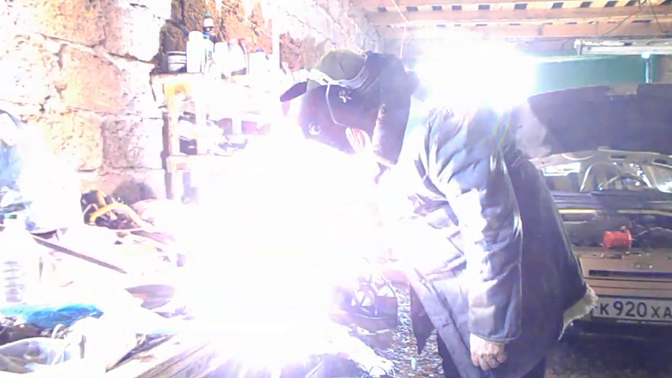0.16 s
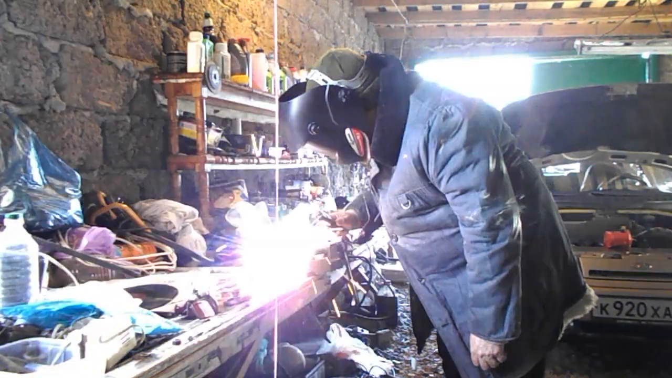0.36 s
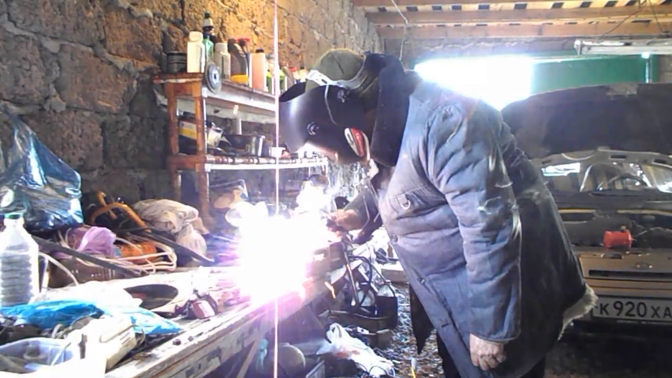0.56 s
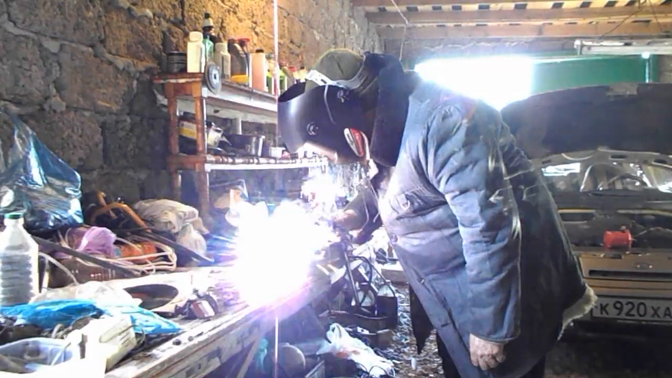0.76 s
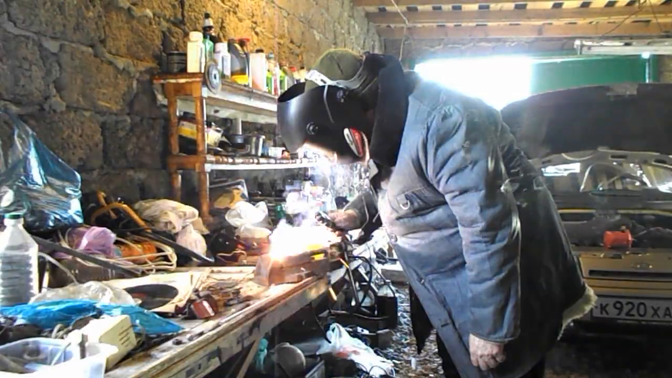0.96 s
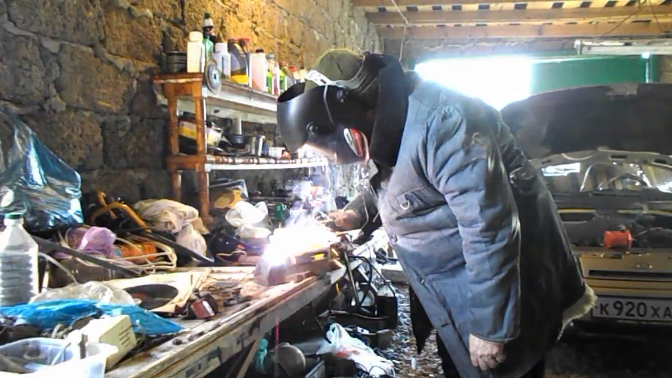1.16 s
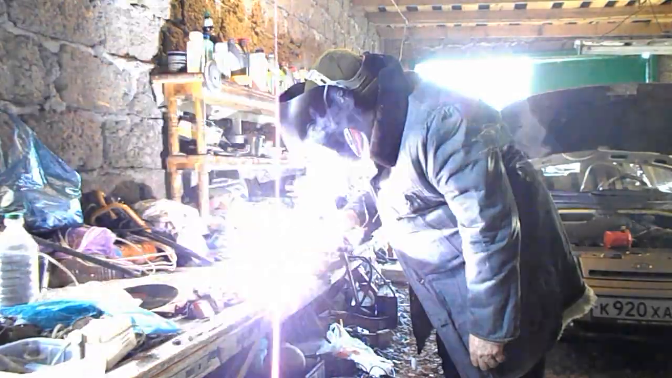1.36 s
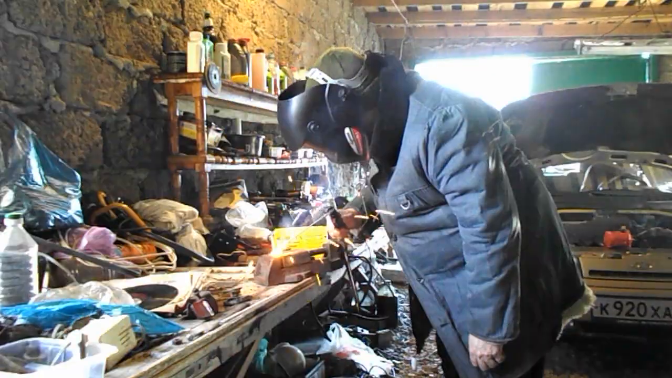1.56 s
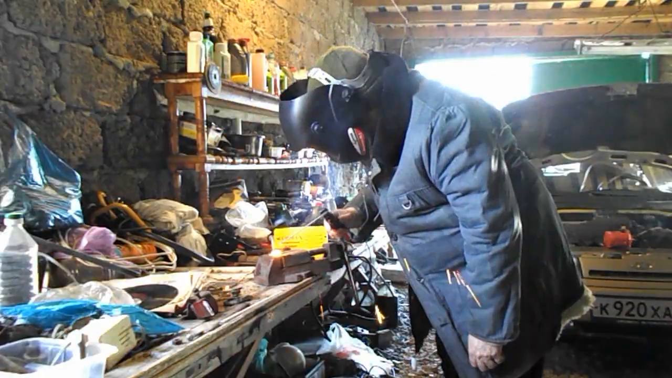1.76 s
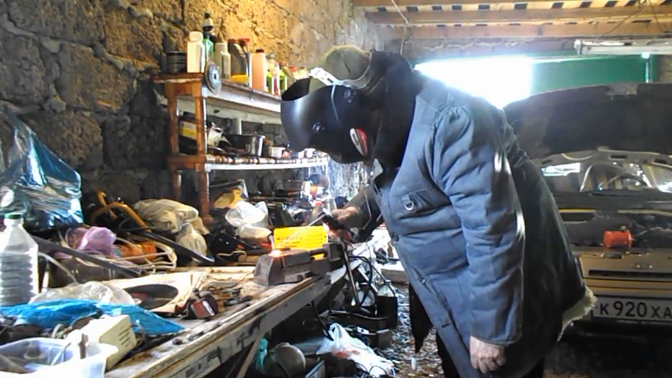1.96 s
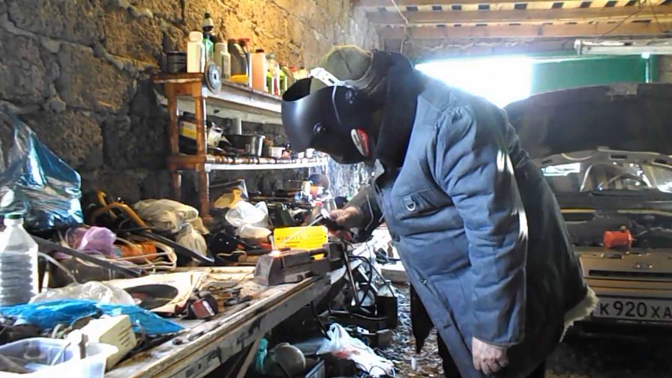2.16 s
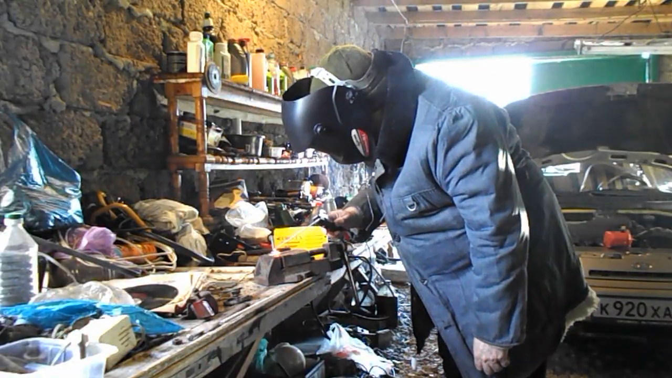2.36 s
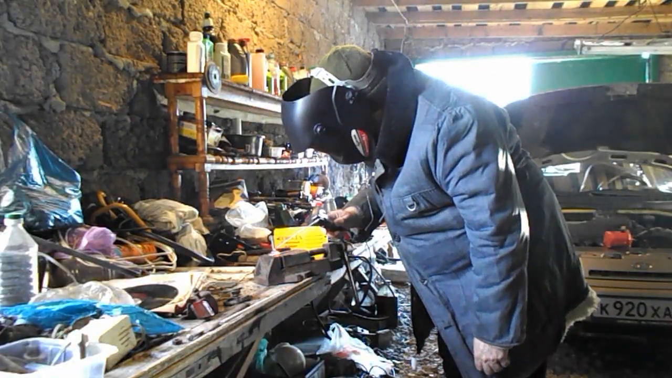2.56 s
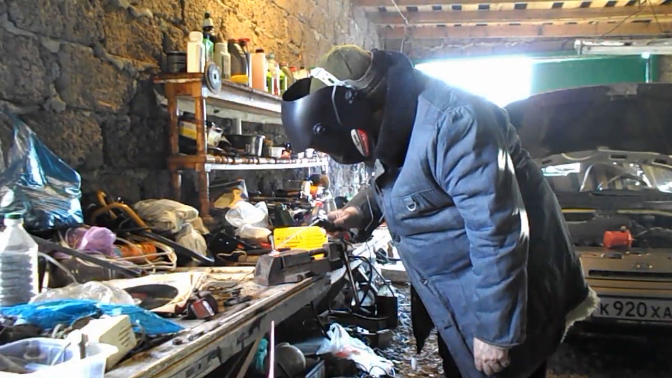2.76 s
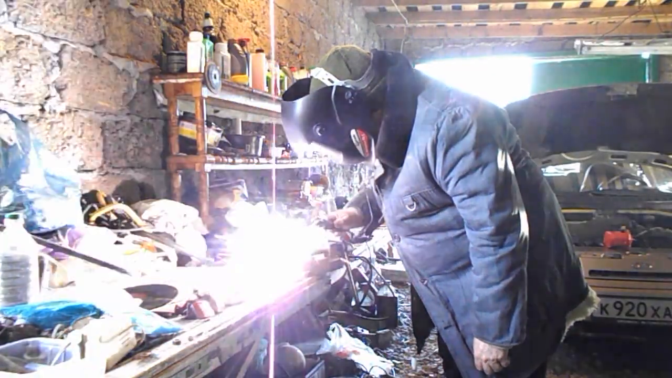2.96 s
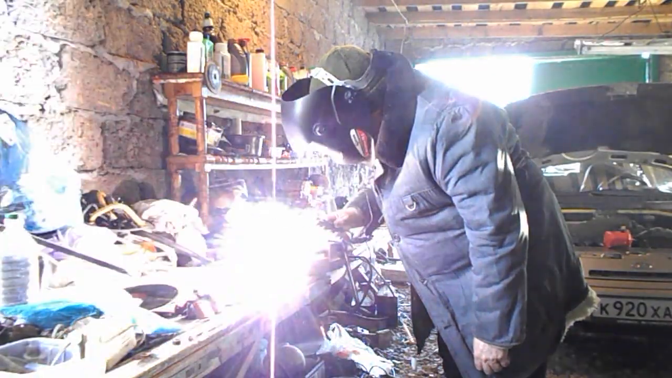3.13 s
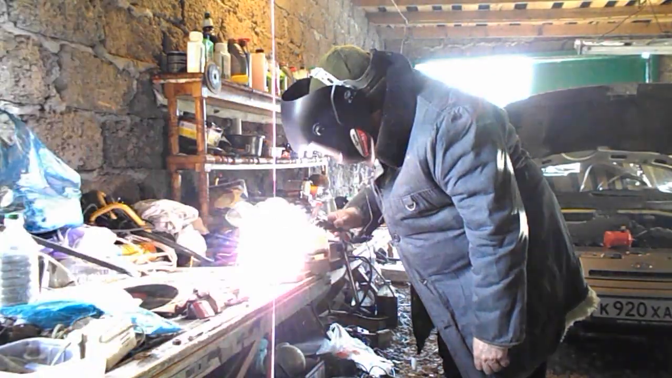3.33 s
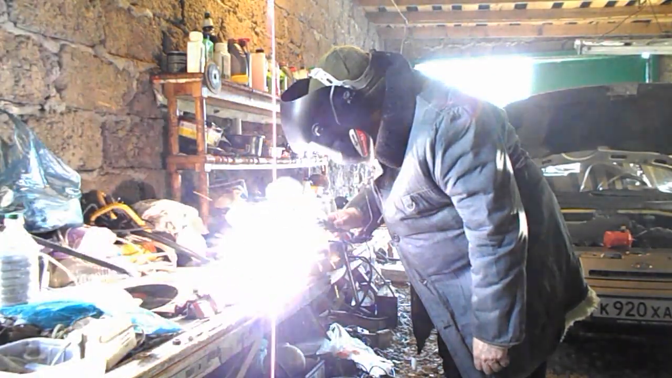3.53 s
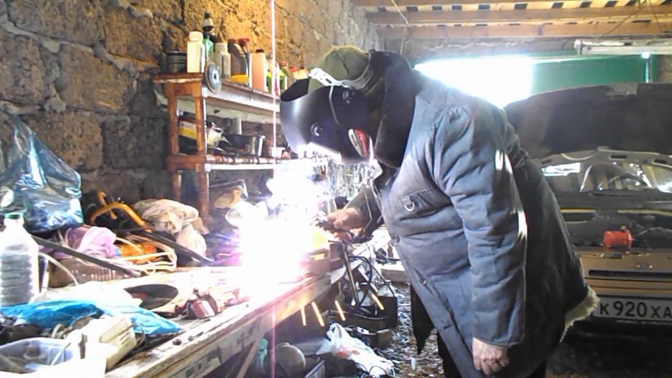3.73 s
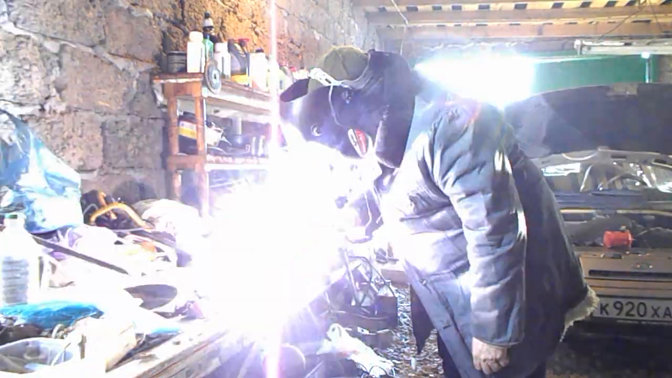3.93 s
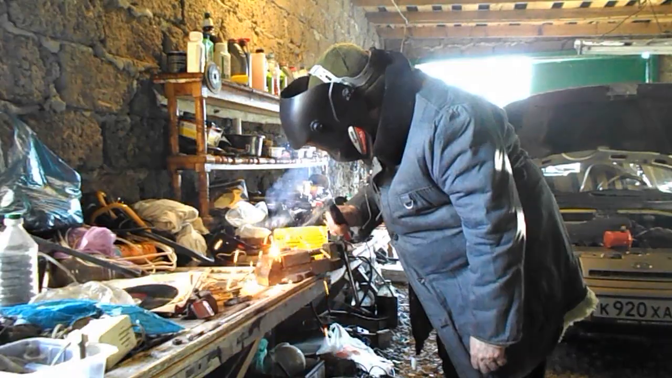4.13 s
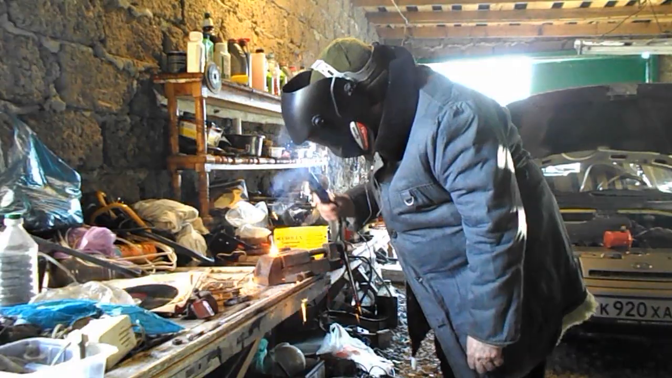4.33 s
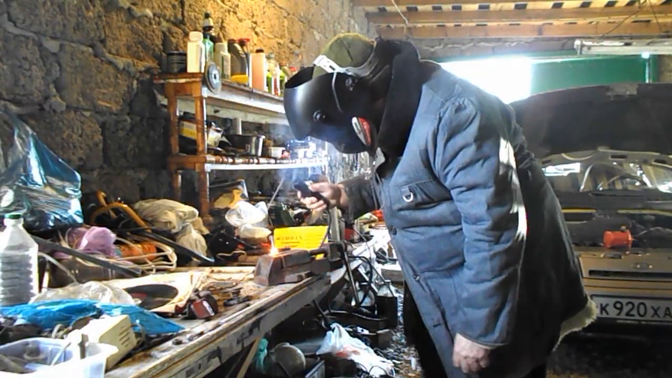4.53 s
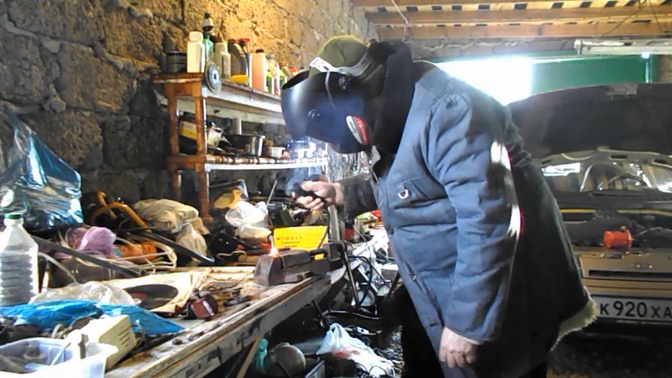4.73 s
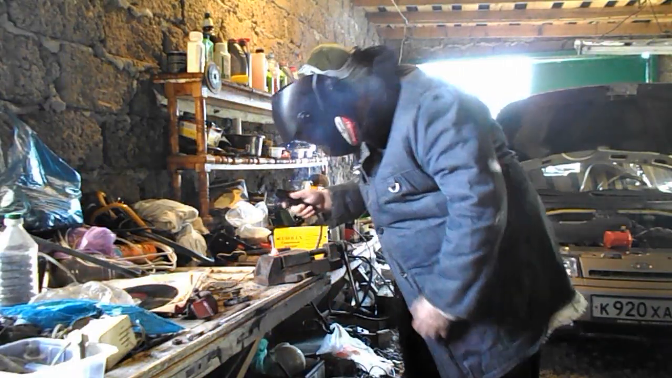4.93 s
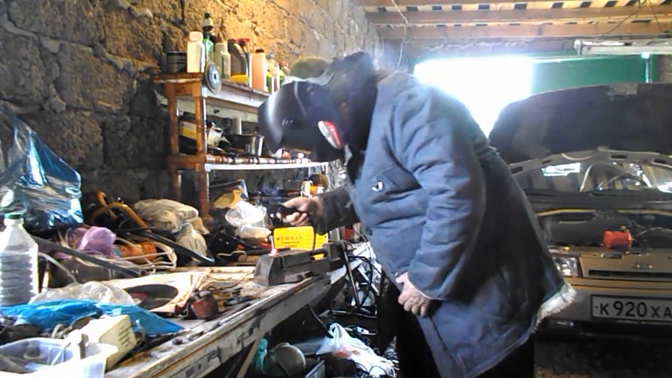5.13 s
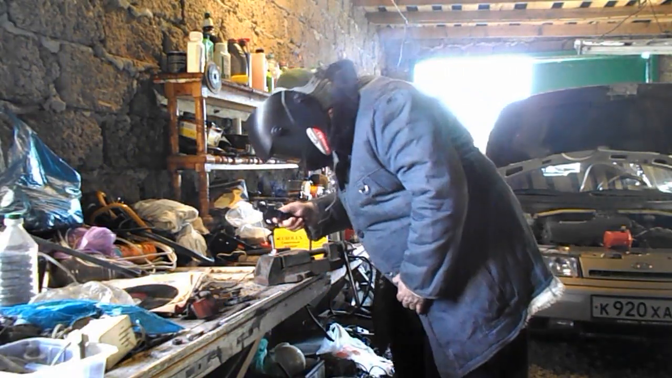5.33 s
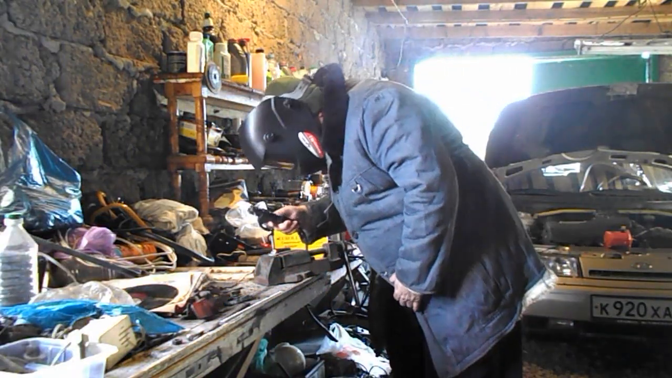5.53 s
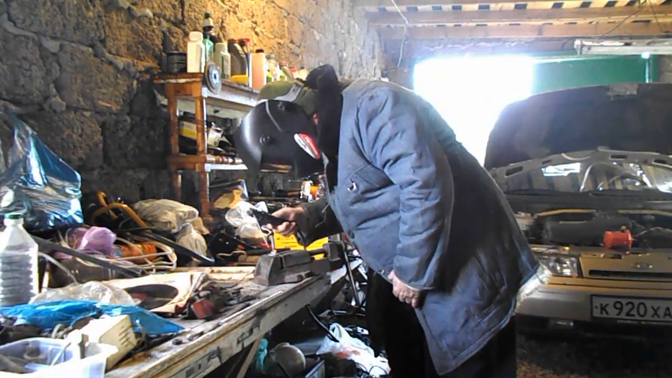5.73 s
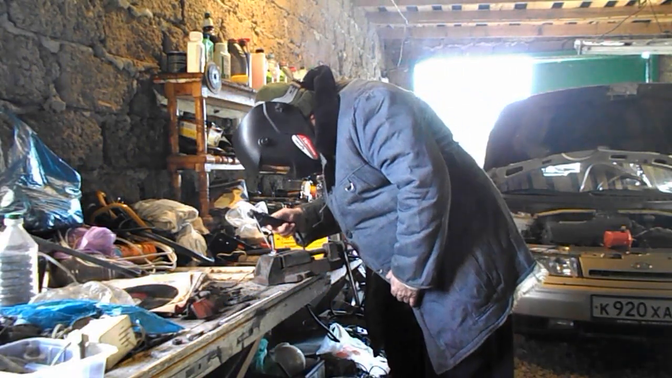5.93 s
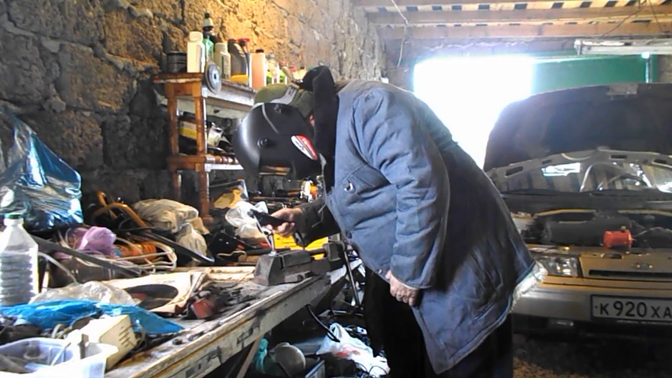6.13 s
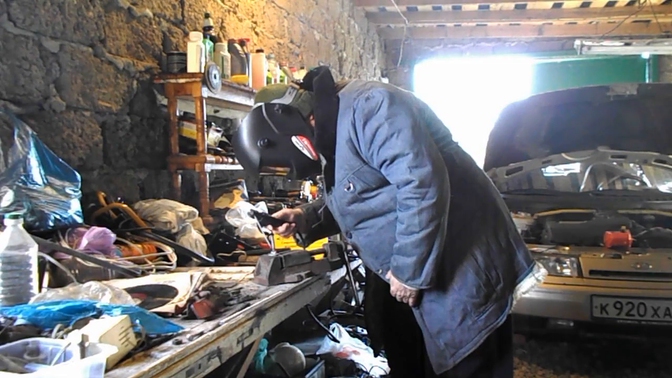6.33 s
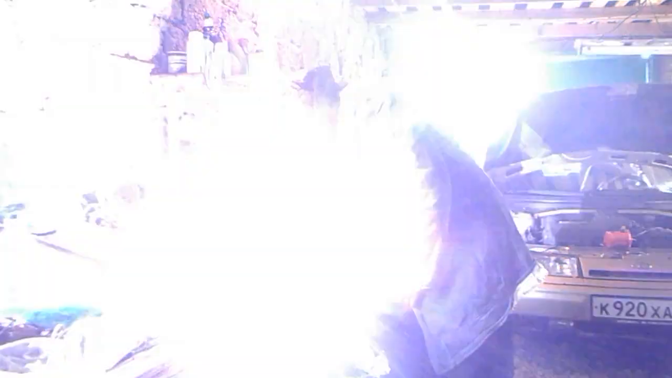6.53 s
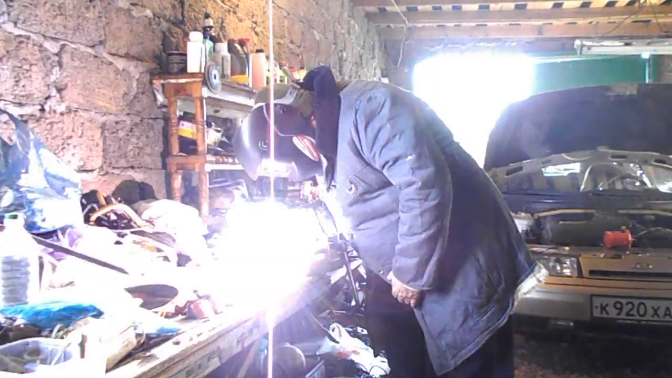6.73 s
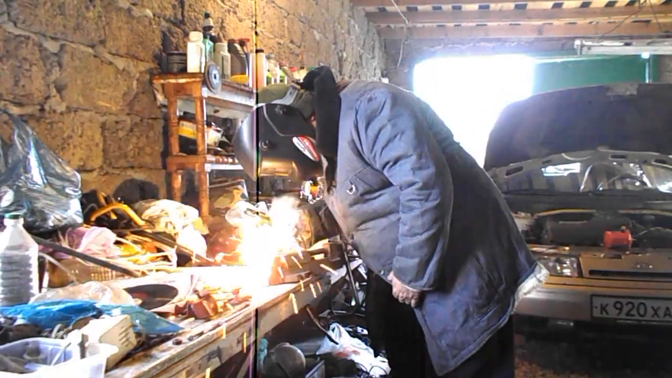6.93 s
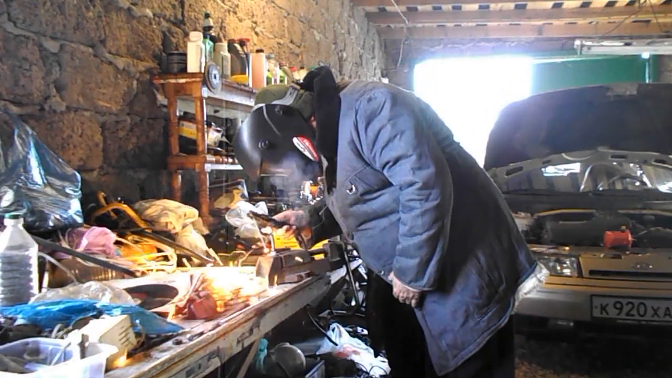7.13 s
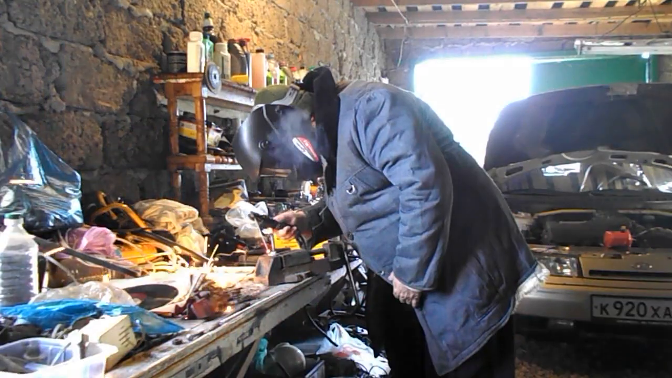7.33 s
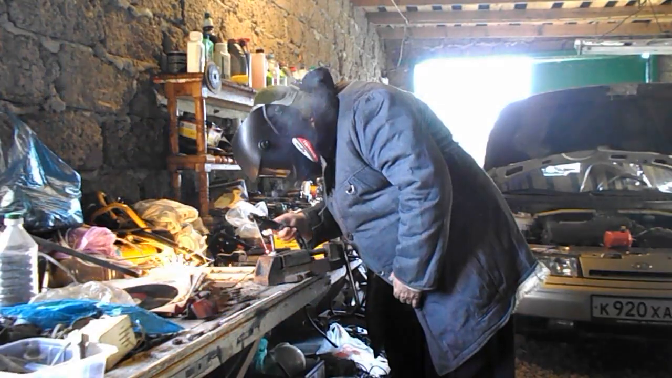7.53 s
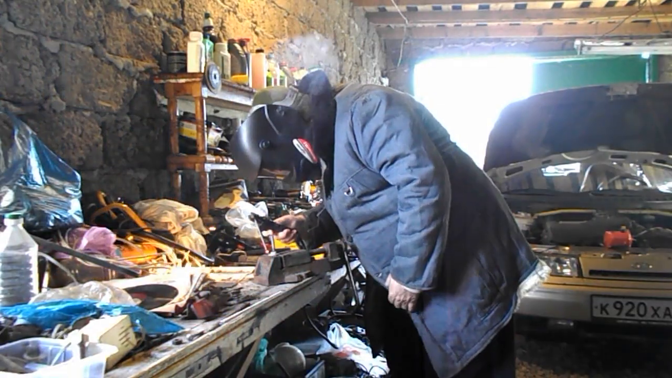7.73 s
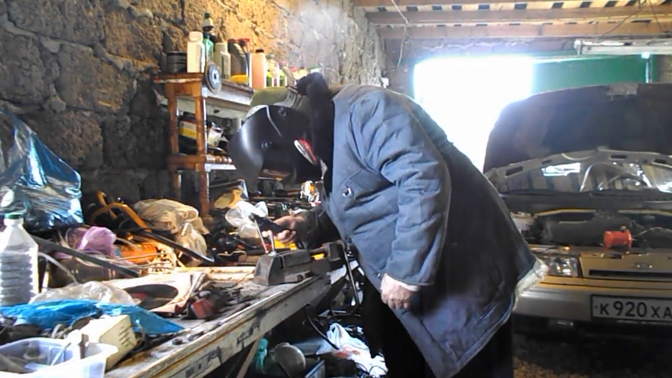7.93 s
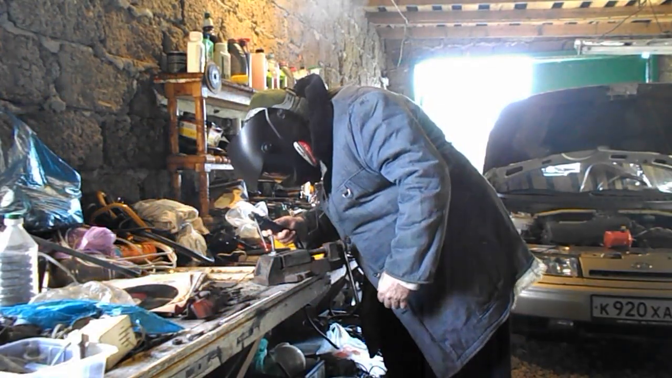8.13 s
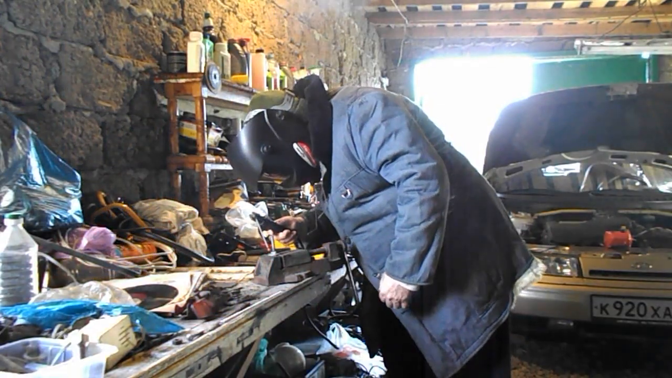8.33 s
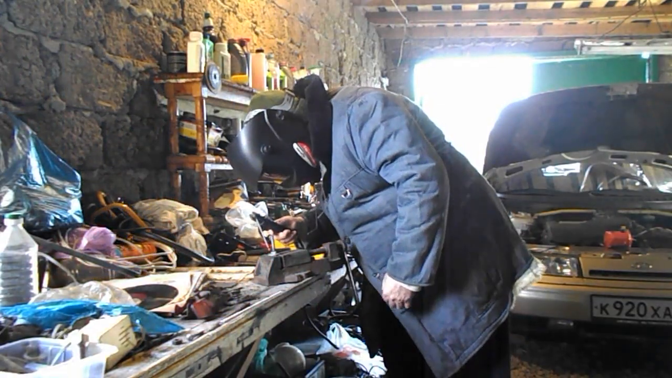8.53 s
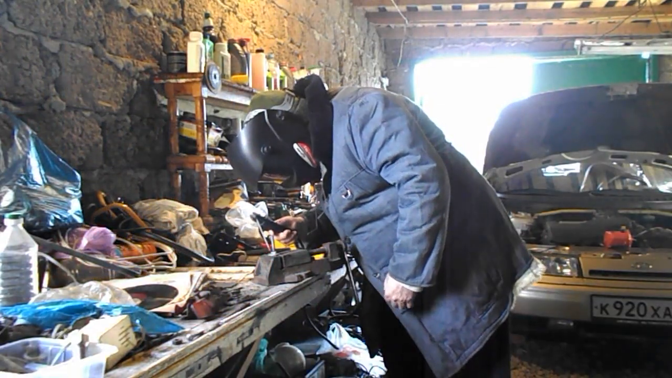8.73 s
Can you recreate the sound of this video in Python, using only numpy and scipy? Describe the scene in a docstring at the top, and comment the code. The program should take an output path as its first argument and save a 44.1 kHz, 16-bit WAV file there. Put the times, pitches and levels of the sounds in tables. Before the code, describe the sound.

Three runs of stick welding: a string of snaps and frying sizzle, a quiet gap, a stronger buzzing-fizzing run with popping spatter, then after sharp metallic clicks and bench thuds a very short explosive crackle. Soft cloth rustle and faint cooling crackles fill the gaps. A fan drones low with airy noise throughout. Heard from nearby in a tight, cluttered stone room, mono and a little rough.

```python
"""An arc cracks, flares and sizzles in three short runs while a fan hums in a small, cluttered stone garage.
Stick welding: random clicks make the sizzle, single spikes make the cracks and the spitting drops of metal.
Around the runs the electrode taps the steel, the bench thuds and the worker's coat rustles: filtered spikes,
ringing tones and dense clicks. The welder's cooling fan is a set of wavering tones plus a rush of noise."""
import sys
import numpy as np
from scipy import signal
from scipy.fft import rfft, irfft
from scipy.io import wavfile
from scipy.ndimage import uniform_filter1d

SR = 44100
rng = np.random.default_rng(int(sys.argv[2]) if len(sys.argv) > 2 else 0)


def wav_record(signal):
    """Record a signal, one row per channel, as 16-bit PCM in the file named by sys.argv[1]."""
    frames = np.transpose(np.atleast_2d(signal))
    bounded = np.clip(frames, -1, 1)
    # unit amplitude maps onto the largest positive 16-bit level
    quanta = np.round(bounded * 32767).astype(np.int16)
    wavfile.write(sys.argv[1], SR, quanta)


N = 391608  # length in samples

# the arc strikes and flares up; sounds start just over 1 ms after t, levels are relative:
# (t/s, crack level/dB, centre f/Hz, flare level/dB)
ARC_STRIKES = [(.1060, -11, 3060, -31.5), (.217, -23, 2220, -40), (.282, -13, 2000, -51),
               (.2885, -9, 3480, -38), (.334, -11.5, 2570, -47), (.384, -8, 2390, -41),
               (.6116, -15, 4000, -50), (2.9668, -4, 2210, -30.5), (3.1195, -8.5, 3520, -31.5),
               (3.5556, -15.5, 3700, -40), (4.1475, -14.5, 2000, -48), (6.6776, -2, 1540, -26.5),
               (6.7814, -13, 2620, -31), (6.886, -9.5, 2400, -33.5), (6.9698, -7.5, 1930, -49),
               (7.0398, -18, 2460, -44)]
# the arc burns until it breaks or a drop of metal shorts it, levels are relative:
# (start t/s, end t/s, sizzle level/dB, fine fizz level/dB)
ARC_BURNS = [(0.109, 0.198, -45, -46), (0.219, 1.587, -39.5, -48), (2.97, 3.086, -34.5, -36.5),
             (3.125, 3.491, -38, -41), (3.535, 3.885, -40, -42.5), (3.926, 4.154, -39.5, -46.5),
             (6.678, 6.758, -34, -46), (6.781, 6.793, -32, -53), (6.828, 6.998, -33.5, -50),
             (7.036, 7.054, -31.5, -60)]
# spectrum of the sizzling melt: (f/Hz, relative level/dB)
SIZZLE_SPECTRUM = [(100, -34), (500, -17), (1100, -1.5), (1700, -1), (2500, -3), (3600, 2.5), (5200, 3),
                   (7000, -4.5), (13000, -17.5)]
# spectrum of the fine, high fizz: (f/Hz, relative level/dB)
FIZZ_SPECTRUM = [(2000, -19), (5000, -16), (8000, 4), (11000, 5), (14000, 3.5)]


def arc(sizzle_db=-2.0, fizz_db=-1.5, roar_db=-17.0, roar_hz=330, flare_fizz_db=-13, flare_s=0.019):
    """Tiny bursts in the melt sizzle, fizz and snap over a low roar of gas; all flicker with the arc's length."""
    # slow swelling and sinking as the hand feeds the rod: (t/s, level/dB)
    swell_points = [(.22, -1.5), (.3, 3), (.5, -1), (.66, -1.5), (.73, -0.5), (.84, 1.5), (.98, -1.5),
                    (1.16, 0), (1.33, 0.5), (1.47, 2.5), (1.6, -4.5), (3.2, -0.5), (3.45, -4.5),
                    (3.62, 2.5), (3.68, -1.5), (4.01, -2.5), (4.09, -5.5), (4.14, 5.5), (6.7, -1.5)]
    boiling = unit(grains(rate=6000, spread_db=2.5))
    snaps = unit(grains(rate=260, spread_db=2.9))
    melt = boiling + 1.24 * snaps
    roar = unit(resonate_twice(rng.standard_normal(N), roar_hz, q=0.66))
    body = undb(sizzle_db) * colour(melt, SIZZLE_SPECTRUM) + undb(roar_db) * roar
    fizz = undb(fizz_db) * colour(melt, FIZZ_SPECTRUM)

    swell = undb(curve(swell_points))
    flaring = flares(ARC_STRIKES, flare_s) * (body + undb(flare_fizz_db) * fizz)
    burning = np.zeros(N)
    for start, end, db, fine_db in ARC_BURNS:
        steady = undb(db) * swell * body + undb(fine_db) * fizz
        burning += gate(start, end) * (steady + flaring)
    flicker = undb(2.7 * walk(rate=130) + 1.4 * walk(rate=35))
    return flicker * burning


def strikes(room_db=-8):
    """Each strike of the arc cracks: a pressure spike through a broad resonance."""
    return bursts(ARC_STRIKES, q=0.48, fray=0.097, fray_s=0.0014, gain_db=7.5, room_db=room_db)


def spatter(centre_hz=6050, room_db=-10):
    """The loudest drops of molten metal burst as short, bright spikes."""
    # sounds start just over 1 ms after t: (t/s, relative level/dB)
    bursting_drops = [(0.4862, -15), (0.5506, -20), (0.5903, -18), (0.6589, -27), (0.9009, -20),
                      (1.1842, -14), (1.2565, -21), (1.3541, -13.5), (1.41, -20), (3.1047, -12),
                      (3.2954, -18), (3.3021, -13.5), (3.3737, -14), (3.3886, -14.5), (3.4346, -17.5),
                      (3.4522, -11.5), (3.4835, -15.5), (3.5055, -19), (3.6596, -12), (3.6897, -17.5),
                      (3.7723, -13), (3.8404, -16.5), (3.8828, -13), (3.8876, -16.5), (3.9392, -12),
                      (3.982, -11.5)]
    drops = [(s, db, centre_hz) for s, db in bursting_drops]
    return bursts(drops, q=0.64, fray=0.35, fray_s=0.0003, gain_db=11., room_db=room_db)


def electrode(contact_ratio=1.46, scrape_hz=3500, scrape_q=0.73, scrape_s=0.013, room_db=-8.5):
    """The rod chatters at each touch of the steel, then scrapes briefly; lower-pitched clicks are duller too."""
    # taps of the rod, sounds start just over 1 ms after t:
    # (t/s, relative click level/dB, centre f/Hz, resonance Q, scrape level/dB)
    touches = [(1.9998, -40, 5140, 1.9, -65), (4.7631, -37.5, 2920, 1.4, -52),
               (4.8614, -42, 4600, 1.8, -60), (4.9418, -20.5, 4120, 6.8, -48), (5, -16, 4260, 3.5, -37),
               (5.0146, -19.5, 2380, 0.61, -35.5), (5.1582, -33.5, 5000, 3.6, -47.5),
               (5.6352, -5, 5360, 0.62, -42), (5.7882, -31.5, 4400, 3.2, -44.5),
               (5.8597, -24, 2420, 1.1, -40.5), (5.9935, -36, 3450, 0.92, -52),
               (6.0508, -27.5, 5440, 0.59, -54), (7.2616, -35.5, 2200, 0.79, -50),
               (8.241, -36, 3970, 1.2, -57)]
    clicks = 0
    for s, db, hz, q, _ in touches:
        click = bursts([(s, db, hz)], q, fray=1.1, fray_s=0.0013, gain_db=13.5, room_db=room_db)
        soften = signal.butter(2, min(contact_ratio * hz, SR / 3), fs=SR, output="sos")
        # the inaudible offset spares the filter from slow, vanishingly small numbers
        clicks = clicks + signal.sosfilt(soften, click + 1e-18)
    grit = resonate_twice(grains(rate=1800, spread_db=3), scrape_hz, scrape_q)
    return clicks + flares(touches, scrape_s) * unit(grit)


def steel(push, ring_db=-31):
    """The rod and the workpiece ring on: the push sets off their decaying tones."""
    # tones of the metal: (f/Hz, relative level/dB, time to fall by 60 dB/s)
    metal_modes = [(2770, -27, 0.32), (3400, -23.5, 0.12), (3510, 0, 0.07), (3850, -20, 0.35),
                   (4277, -5, 0.067), (4730, 1, 0.2), (4770, 7, 0.025), (5200, -16, 0.103),
                   (5720, 15, 0.047)]
    return undb(ring_db) * signal.fftconvolve(push, ring(metal_modes))[:N]


def slag(crackle_db=-58, cooling_s=0.16, simmer_db=-53):
    """After each burn the hot bead simmers and crackles faintly, dying away as it cools."""
    t = np.arange(N) / SR
    cooling = [(t > end) * np.exp(-np.abs(t - end) / cooling_s) for _, end, *_ in ARC_BURNS]
    heat = np.max(cooling, axis=0)
    crackle = colour(grains(rate=280, spread_db=8.5), FIZZ_SPECTRUM)
    simmer = colour(grains(rate=1500, spread_db=6), SIZZLE_SPECTRUM)
    return heat * (undb(crackle_db) * crackle + undb(simmer_db) * simmer)


def coat(cloth_db=-8.0, crinkle=0.95, swish_db=-11.5, swish_width=0.3, uneven_db=2.0):
    """Stiff cloth rubs in dense grains, its folds crinkle and its weave swishes as the arm moves."""
    # strokes of the arm, levels are relative: (middle t/s, length/s, level/dB, centre of the swish f/Hz)
    arm_strokes = [(4.615, 0.085, -45, 3880), (5.25, 0.66, -52, 5600), (5.72, 0.045, -45.5, 4730),
                   (5.92, 0.22, -54, 4200), (7.45, 0.33, -57, 3760), (7.83, .4, -53, 5070),
                   (8.06, 0.083, -51, 4080), (8.23, 0.16, -55.5, 5400)]
    # spectrum of rubbing cloth: (f/Hz, relative level/dB)
    cloth_spectrum = [(60, -26), (300, -2), (1500, -8.5), (3000, -4), (5000, -1.5), (8000, -14),
                      (13000, -16.5)]
    t = np.arange(N) / SR
    rub = unit(grains(rate=7200, spread_db=8.5))
    folds = unit(grains(rate=60, spread_db=2.2))

    # six noise bands; those near the moving centre are the loudest
    centre = np.log(curve(arm_strokes, column=3))
    swish = np.zeros(N)
    for hz in np.geomspace(3000, 7000, num=6):
        band = resonate(resonate(rng.standard_normal(N), hz, q=1.7), hz, q=3)
        swish += band * np.exp(-((np.log(hz) - centre) / swish_width) ** 2)
    cloth = undb(cloth_db) * colour(rub + crinkle * folds, cloth_spectrum) + undb(swish_db) * unit(swish)

    # each stroke swells and fades like a bell curve
    power = sum(undb(db) ** 2 * np.exp(-(2 * (t - s) / length) ** 2) for s, length, db, _ in arm_strokes)
    return cloth * np.sqrt(power) * undb(uneven_db * walk(rate=45))


def bench(q=0.95):
    """Dull knocks: a slow push wakes the low modes of the loaded wooden bench, a quick one the higher ones."""
    # pushes on the bench: (t/s, peak level/dB, centre of the push f/Hz)
    pushes = [(4.148, -42, 95), (4.945, -40, 170), (5.010, -29.5, 418), (5.045, -42.5, 122),
              (5.638, -34, 343), (5.862, -30, 357), (6.68, -46, 190), (6.972, -36.5, 170)]
    # tones of the bench: (f/Hz, relative level/dB, time to fall by 60 dB/s)
    wood_modes = [(118, -3, 0.17), (170, -4.5, 0.28), (227, 8, 0.072), (316, 2.5, 0.053), (433, 1, 0.16),
                  (533, 4, 0.18)]
    out = np.zeros(N)
    for s, db, hz in pushes:
        knock = resonate_twice(ring(wood_modes), hz, q)
        add(out, s, undb(db) * knock / np.abs(knock).max())
    return out


def fan(air_db=-54.0, blade_waver_db=1.5, motor_waver_db=0.2, wobble=0.0012):
    """Blade tones waver in the turbulent air, the motor's whine is steadier, and air rushes through the case."""
    # tones of the seven-bladed fan: (multiple of the shaft rate, relative rms level/dB)
    shaft_orders = [(7, -57), (8, -59.5), (9, -67.5), (12, -75), (20, -61.5), (21, -76), (24, -79.5),
                    (28, -78.5), (32, -76.5)]
    # shaft rate before its slight wobble: (t/s, f/Hz)
    shaft_speed = [(0, 70.9), (2.5, 71), (6.5, 71.36), (8.8, 71.04)]
    # loudness of the whole fan: (t/s, relative level/dB)
    loudness = [(0, 2), (2.5, 2), (4.5, 1.5), (5.4, 2.5), (6.3, 1.26), (8.8, 1)]
    # spectrum of the rushing air: (f/Hz, relative level/dB)
    air_spectrum = [(25, -63), (58, -4.5), (80, -11), (150, -1.5), (280, -1), (600, 0.5), (1000, 0.5),
                    (1300, -8.5), (2200, -11.5), (4500, -14.5), (6200, -20.5), (8000, -32), (13000, -37)]
    turn = 2 * np.pi * np.cumsum(curve(shaft_speed) * (1 + wobble * walk(rate=6))) / SR
    tones = np.zeros(N)
    for order, db in shaft_orders:
        waver_db = blade_waver_db if order < 10 else motor_waver_db
        phase = order * turn + 2 * np.pi * rng.random() + 0.25 * waver_db * walk(rate=26)
        level = np.sqrt(2) * undb(db + waver_db * walk(rate=25))  # root 2 turns rms into peak
        tones += level * np.sin(phase)
    air = colour(rng.standard_normal(N), air_spectrum) * undb(air_db + .5 * walk(rate=8))
    return (tones + air) * undb(curve(loudness))


def garage(x, t60_low=.28, t60_high=.195, tail_db=0., split_hz=1500):
    """Reflections only: a few off near surfaces, then a short diffuse tail whose treble dies sooner."""
    # bench, wall and shelves: (delay/s, gain before the clutter)
    surfaces = [(.0021, .14), (.0042, .14), (.0083, .2), (.0125, .14), (.0185, .14)]
    t = np.arange(SR // 2) / SR
    noise = rng.standard_normal(len(t))
    low = signal.sosfilt(signal.butter(2, split_hz, fs=SR, output="sos"), noise)
    high = signal.sosfilt(signal.butter(2, split_hz, "high", fs=SR, output="sos"), noise)
    # the minus sign lets the two bands join without a dip
    tail = low * 1000 ** (-t / t60_low) - high * 1000 ** (-t / t60_high)
    tail *= 1 - np.exp(-t / .003)  # soft onset
    tail *= undb(tail_db) / np.linalg.norm(tail)
    for delay, gain in surfaces:
        tail[int(delay * SR)] += gain
    # clutter soaks up the top
    tail = signal.sosfilt(signal.butter(1, 9000, fs=SR, output="sos"), tail)
    return signal.fftconvolve(x, tail)[:N]


def bursts(rows, q, fray, fray_s, gain_db, room_db):
    """Each burst is one pressure spike with a frayed end; returns the direct sound and what goes to the walls."""
    direct, sent = np.zeros(N), np.zeros(N)
    t = np.arange(SR // 50) / SR
    spike = 1. * (t == 0)
    for s, db, hz, *_ in rows:
        at = s + 0.001188
        noise = rng.standard_normal(len(t))
        frayed = resonate(spike + fray * noise * np.exp(-t / fray_s), hz, q)
        add(direct, at, undb(db + gain_db) * frayed / np.linalg.norm(frayed))
        # the walls gather sound from all directions, which evens out its colour
        even = resonate(spike, hz, q)
        add(sent, at, undb(db + gain_db + room_db) * even / np.linalg.norm(even))
    return np.array([direct, sent])


def flares(rows, decay_s):
    """An envelope that jumps at each event to the level in its last column and falls to 1/e in decay_s."""
    out = np.zeros(N)
    fall = np.exp(-np.arange(SR // 4) / SR / decay_s)
    for s, *_, db in rows:
        add(out, s + 0.0014, undb(db) * fall)
    return out


def ring(modes):
    """Decaying modes after one blow, with unit energy."""
    t = np.arange(SR // 3) / SR
    sound = np.zeros(len(t))
    for hz, db, t60 in modes:
        sound += undb(db) * np.cos(2 * np.pi * hz * t) * np.exp(-np.log(1000) * t / t60)
    return sound / np.linalg.norm(sound)


def grains(rate, spread_db):
    """Random tiny clicks, rate per second on average, many small and a few large."""
    hit = rng.random(N) < rate / SR
    size = undb(spread_db * np.minimum(rng.exponential(size=N), 5))
    return hit * size * np.sign(rng.standard_normal(N))


def walk(rate):
    """Smooth random drift with a spread of 1, taking a new step rate times per second."""
    k = int(SR / rate)
    steps = rng.standard_normal(N)[np.arange(N) // k]
    return unit(uniform_filter1d(uniform_filter1d(steps, k), k))


def resonate(x, hz, q):
    """Two-pole band-pass: keeps what lies near hz; a higher q is narrower."""
    w = 2 * np.pi * min(hz, SR / 3) / SR
    a = np.sin(w) / (2 * q)
    return signal.lfilter([a, 0, -a], [1 + a, -2 * np.cos(w), 1 - a], x)


def resonate_twice(x, hz, q):
    """The same band-pass twice, for steeper sides."""
    return resonate(resonate(x, hz, q), hz, q)


def response(points):
    """Gain of a (f/Hz, level/dB) spectrum at every frequency bin of the whole track."""
    hz, db = np.transpose(points)
    bins = np.fft.rfftfreq(N, 1 / SR) + 1  # the 1 avoids log of zero
    return undb(np.interp(np.log(bins), np.log(hz), db))


def colour(x, points):
    """Shape a signal by a spectrum; rms 1."""
    return unit(irfft(rfft(x) * response(points), N))


def curve(rows, column=1):
    """One column of a table, joined by straight lines in time."""
    rows = np.array(rows)
    return np.interp(np.arange(N) / SR, rows[:, 0], rows[:, column])


def gate(start, end):
    """One from start to end, with quick fades."""
    t = np.arange(N) / SR
    return uniform_filter1d(1. * ((t >= start) & (t <= end)), size=130)


def add(track, s, sound):
    """Mix a sound in at s seconds."""
    i = max(int(s * SR), 0)
    track[i:i + len(sound)] += sound[:N - i]


def undb(db):
    """Decibels to gain."""
    return 10 ** (np.asarray(db) / 20)


def unit(x):
    """Scale to rms 1."""
    return x / np.sqrt(np.mean(x ** 2))


def scene(arc_room_db=-3):
    """Work and coat are heard directly and off the garage walls; bench and fan directly only."""
    # two rows: the sound that goes straight to the microphone, and the sound that goes to the walls
    work = strikes() + spatter() + electrode() + arc() * undb([[0], [arc_room_db]])
    direct, sent = work + steel(work[0]) + slag() + coat()
    return (direct + garage(sent) + bench() + fan())[None]


def record(dry, ceiling=0.36, low_cut_hz=50, pass_hz=5970, top_hz=14200):
    """The recorder rounds the sharpest peaks and drops the deep bass; its treble falls in lobes with nulls between."""
    # where the treble filter lets nothing through: (f/Hz)
    nulls = [7000, 8530, 10000, 12050, 14000]
    # extra gain that shapes the lobes between the nulls: (f/Hz, level/dB)
    lobe_heights = [(5500, -0.5), (7700, -5.5), (9300, -3.5), (10900, 3.5), (11700, -13), (12800, -16.5),
                    (14000, -33)]
    rounded = ceiling * np.tanh(dry / ceiling)
    thinned = signal.sosfilt(signal.butter(2, low_cut_hz, "high", fs=SR, output="sos"), rounded)
    # a sine over frequency: full up to pass_hz, zero at each null
    hz = np.fft.rfftfreq(N, 1 / SR)
    lobe = np.interp(hz, [pass_hz, *nulls], [.5, *range(1, len(nulls) + 1)])
    treble = np.abs(np.sin(np.pi * lobe)) * response(lobe_heights)
    heard = irfft(rfft(thinned) * treble, N)
    return signal.sosfilt(signal.ellip(8, .2, 70, top_hz, fs=SR, output="sos"), heard)


dry = scene()
out = record(dry)
wav_record(out)
```